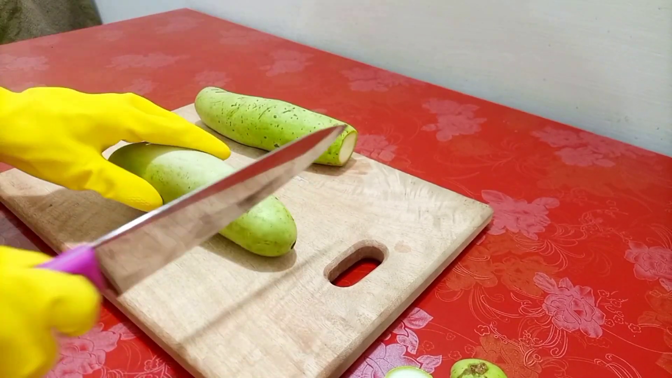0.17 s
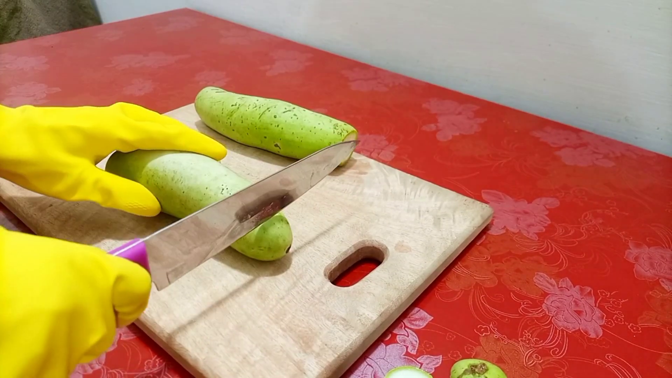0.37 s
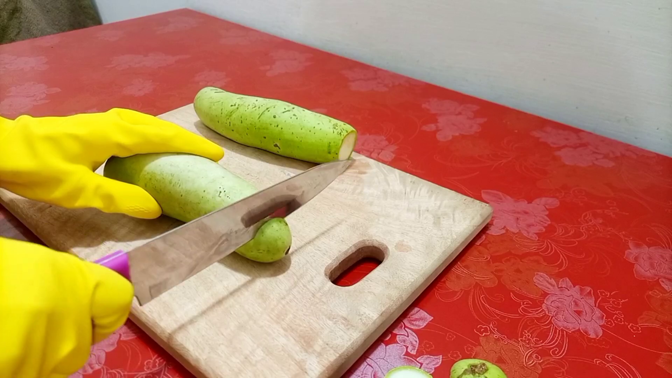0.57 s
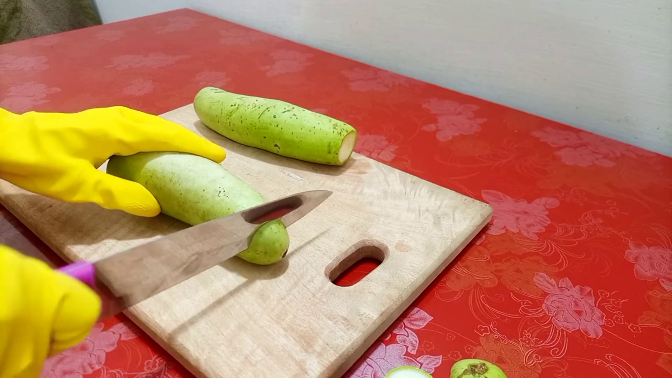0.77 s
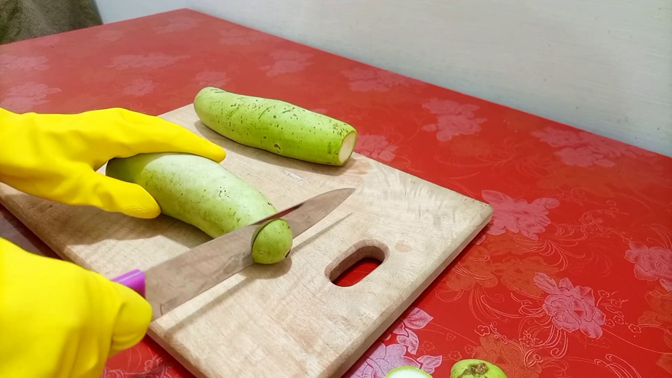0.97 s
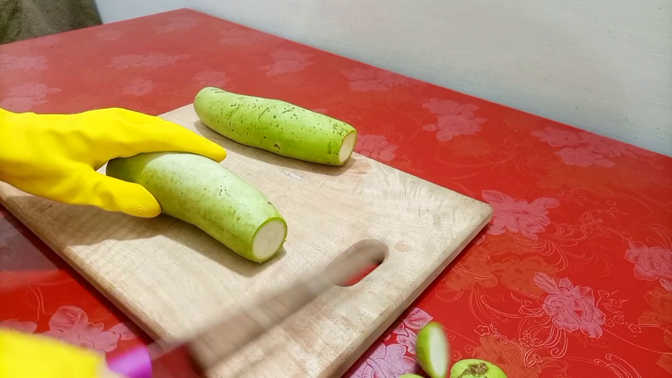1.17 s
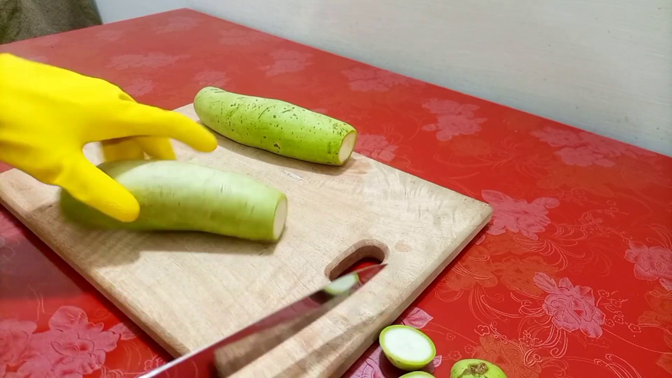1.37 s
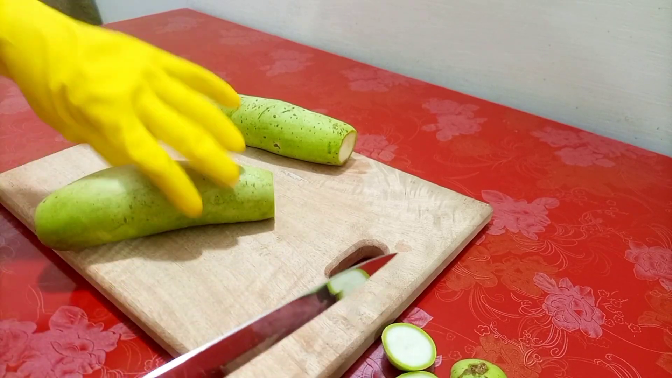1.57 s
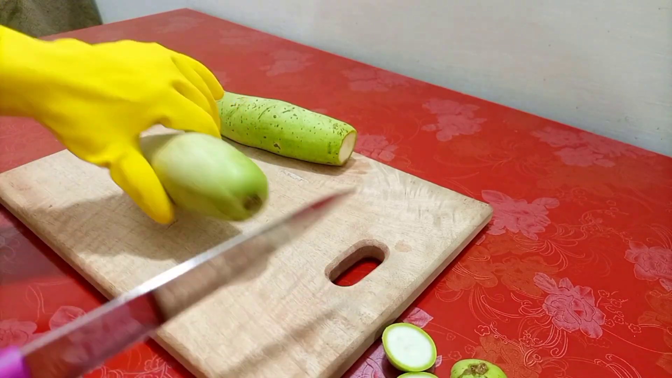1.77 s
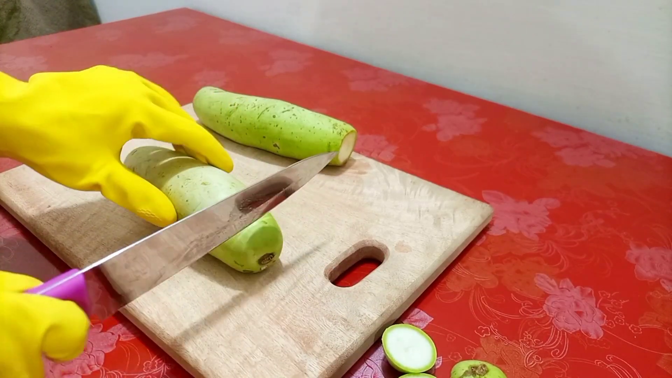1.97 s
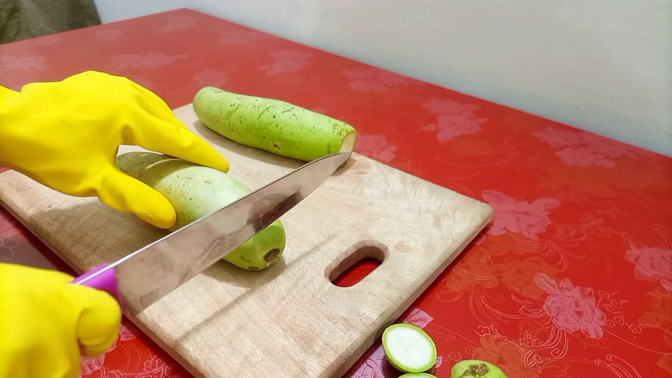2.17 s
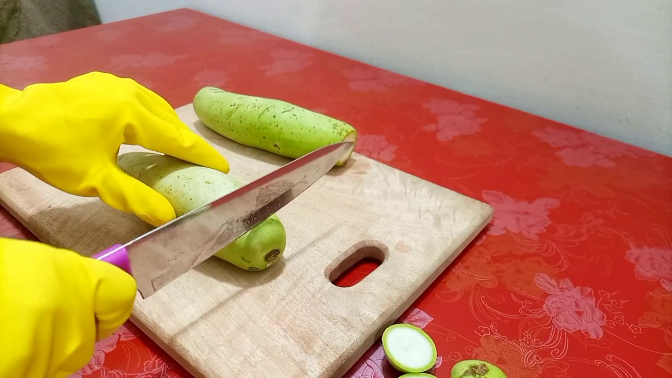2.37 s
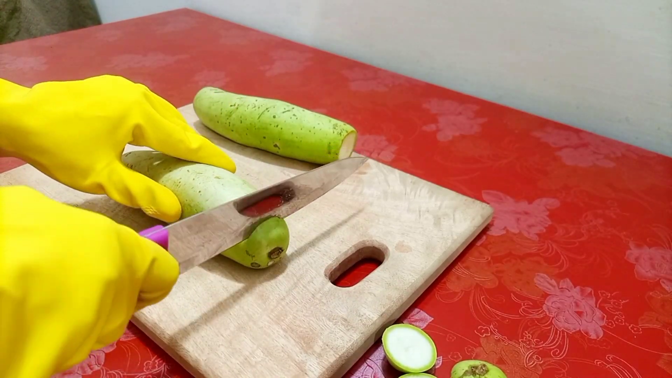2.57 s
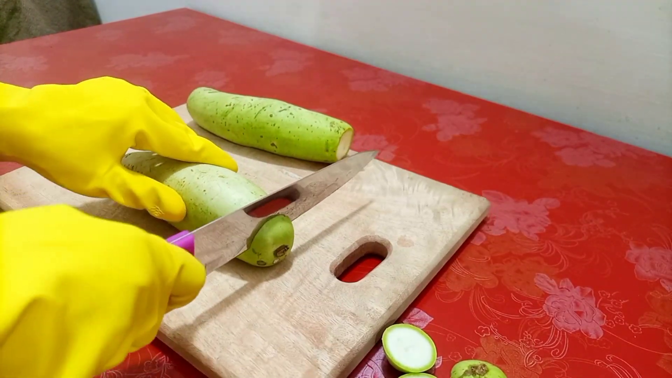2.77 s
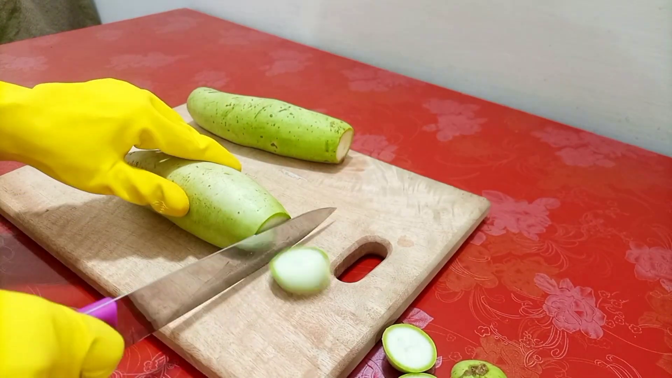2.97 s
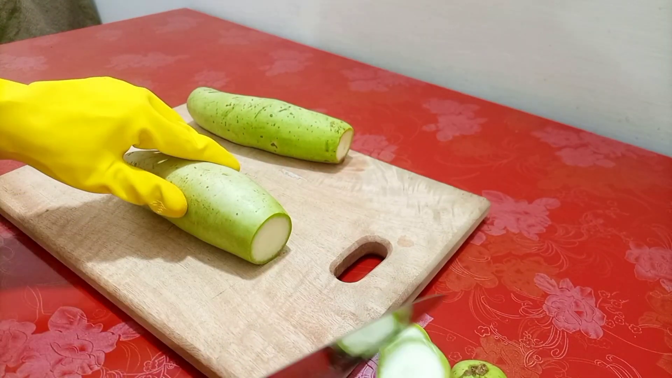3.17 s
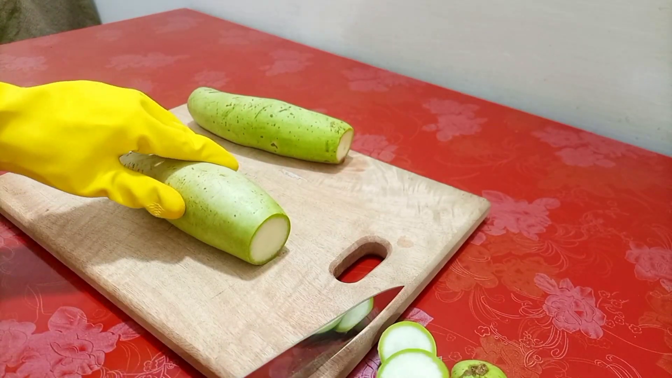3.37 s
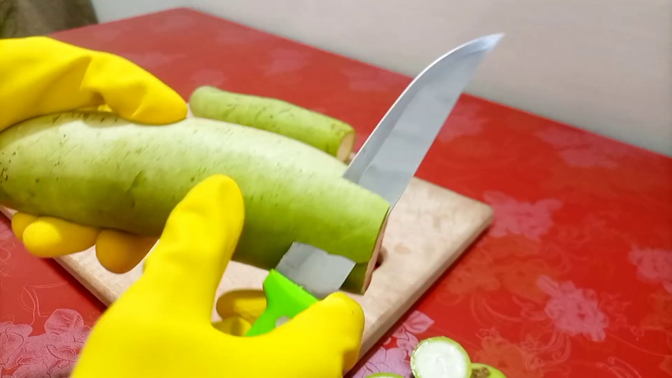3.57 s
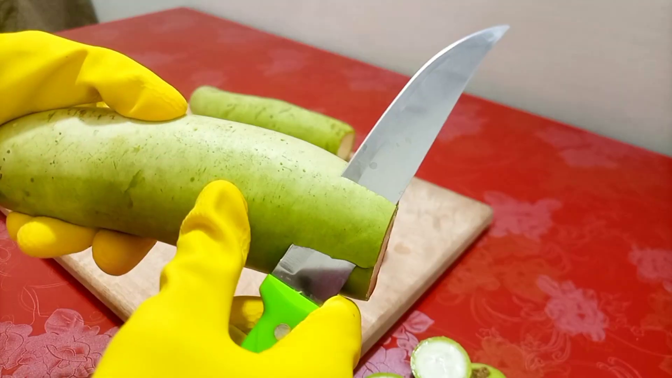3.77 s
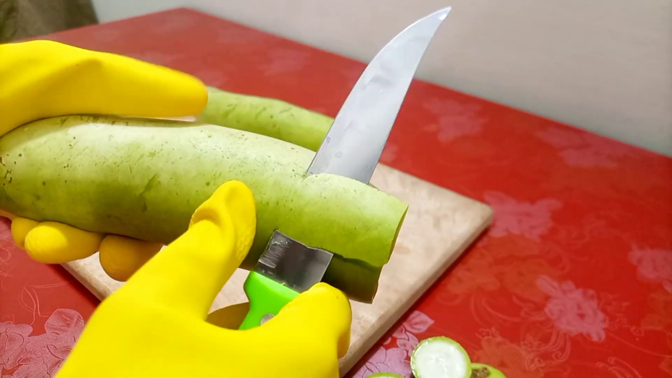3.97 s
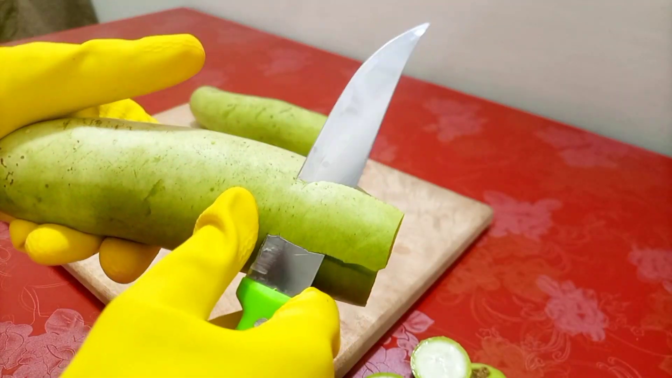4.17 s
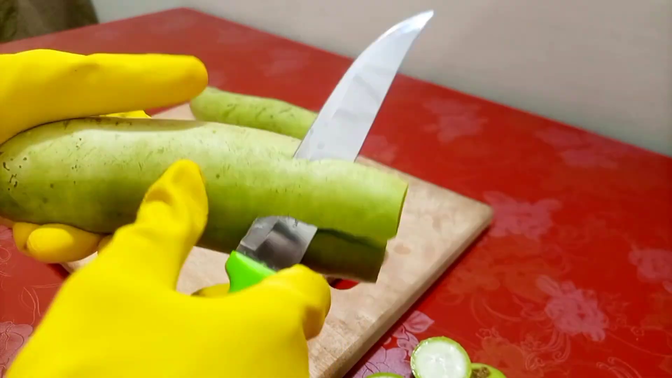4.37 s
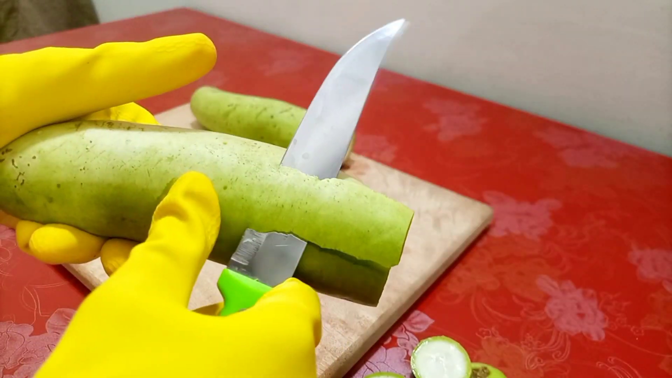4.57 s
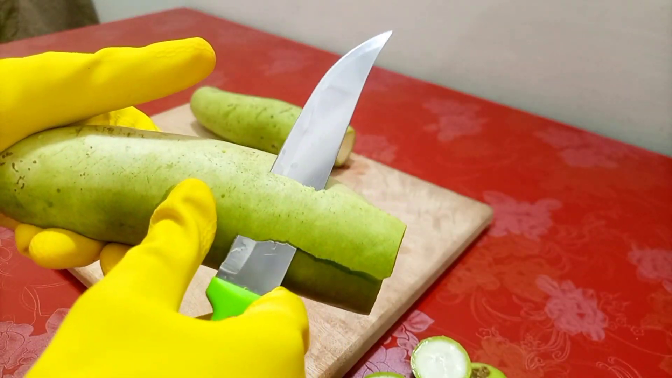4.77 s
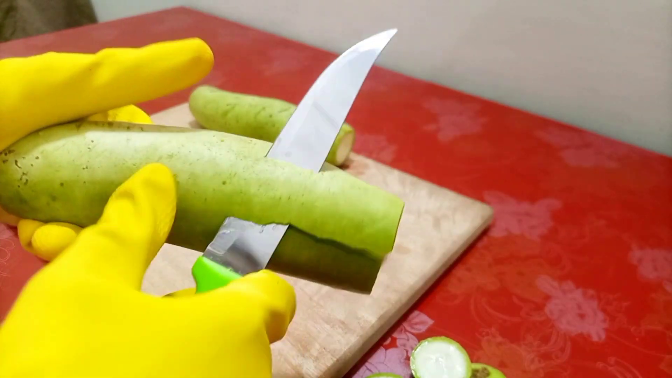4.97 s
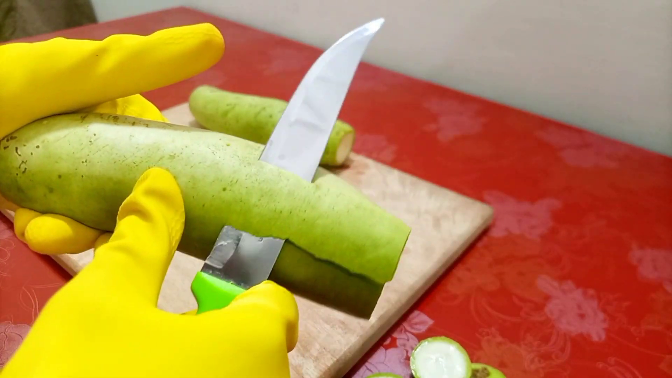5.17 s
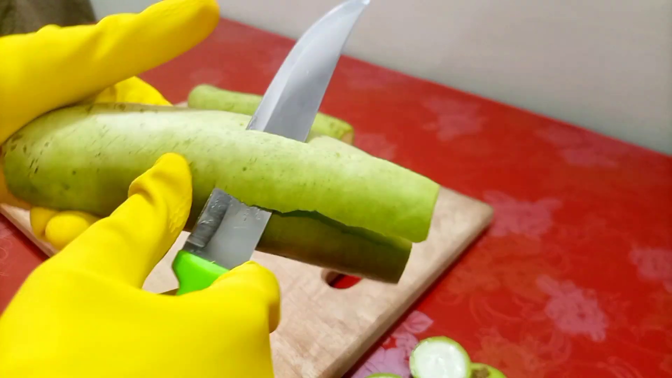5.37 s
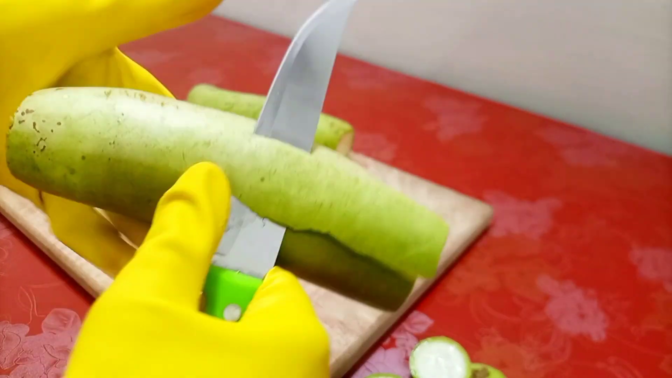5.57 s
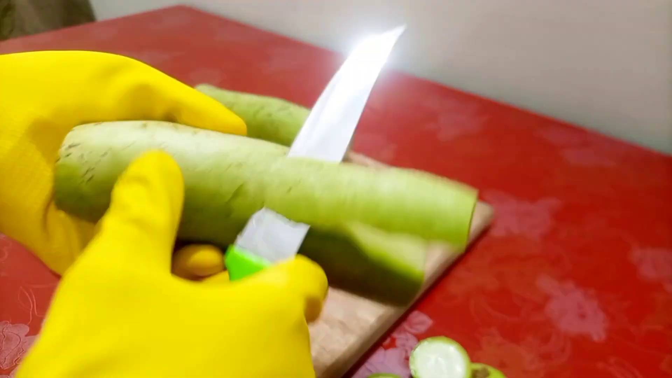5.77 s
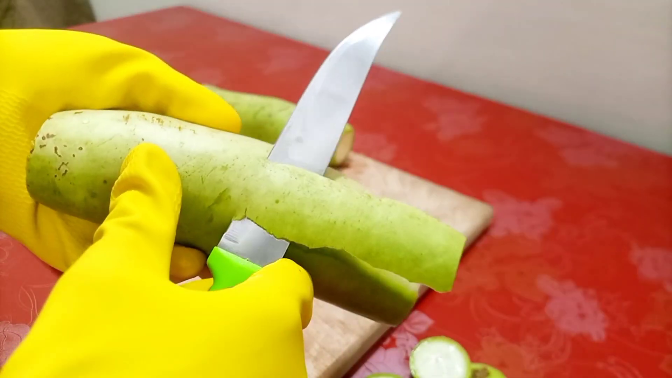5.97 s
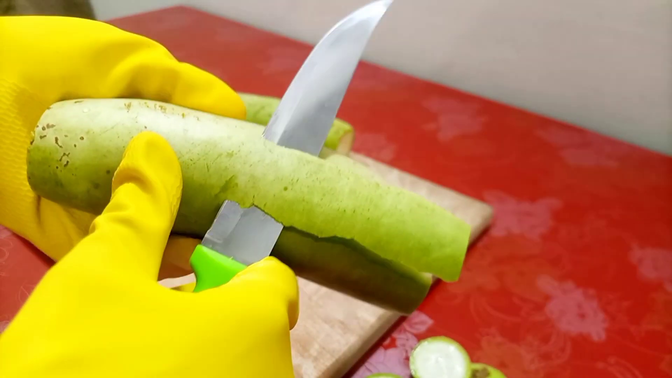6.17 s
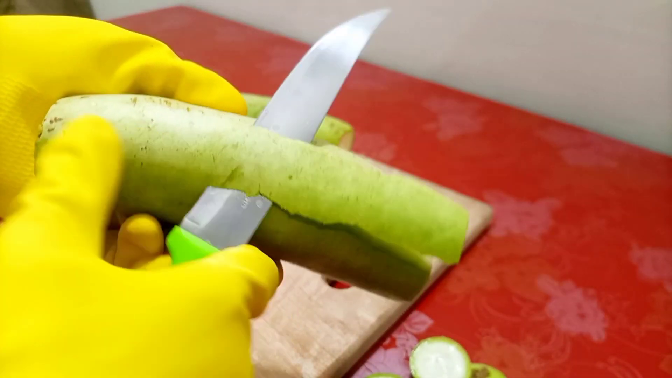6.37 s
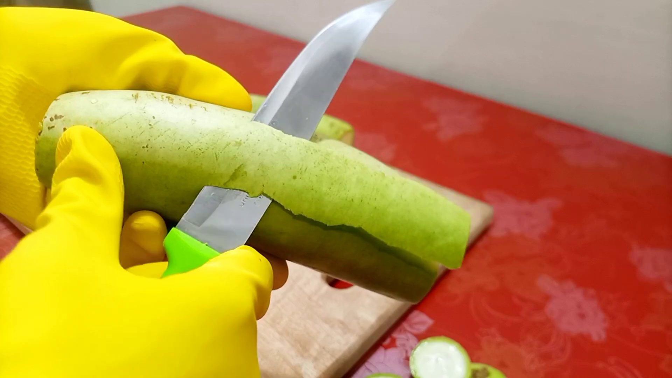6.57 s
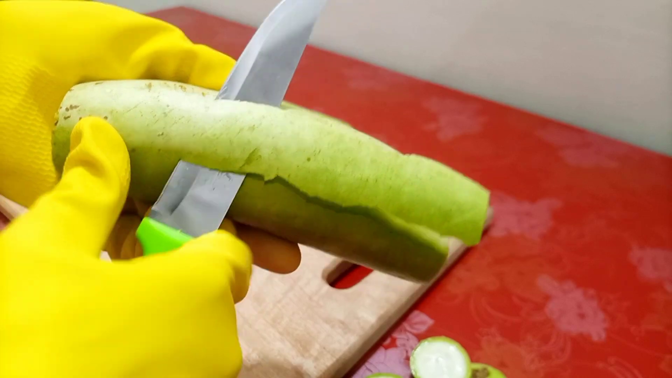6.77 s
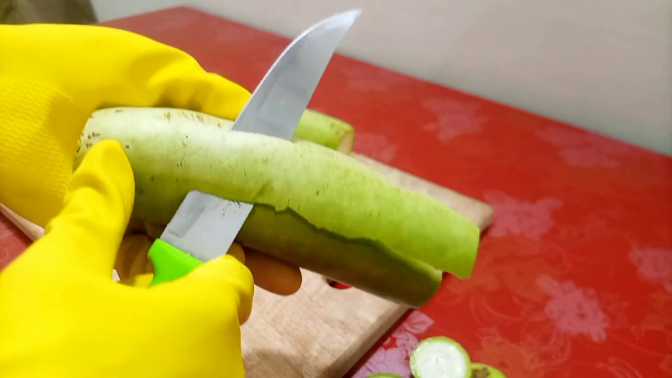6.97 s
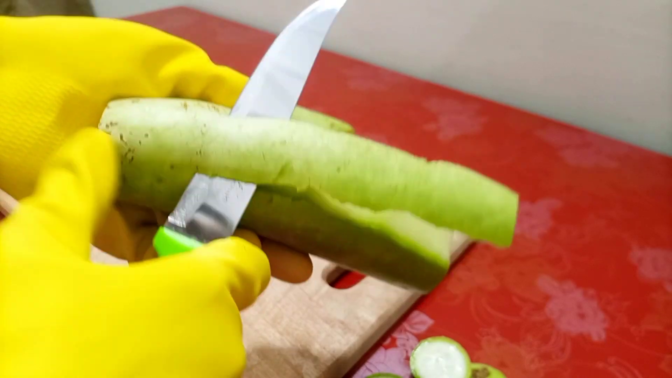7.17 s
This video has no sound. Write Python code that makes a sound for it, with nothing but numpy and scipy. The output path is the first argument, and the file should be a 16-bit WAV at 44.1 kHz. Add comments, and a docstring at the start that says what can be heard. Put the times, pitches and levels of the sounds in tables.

```python
"""An appliance hums under a steady hiss while hands and a squash bump a table in soft, low thuds.
After one second a knife cuts through the squash and hits a wooden board with a dry, ringing knock.
Hollow taps and faint ticks of the peel follow. Near three seconds comes a second chop, and a slice
falls. The sound drops out for a moment, then thuds and ticks carry on more quietly."""
import sys
import numpy as np
from scipy import signal
from scipy.fft import rfft, irfft, next_fast_len
from scipy.io import wavfile
from scipy.ndimage import uniform_filter1d, map_coordinates

SR = 44100
rng = np.random.default_rng(int(sys.argv[2]) if len(sys.argv) > 2 else 0)


def master_out(mix):
    """Clip the mix to full scale and print it as 16-bit PCM to the path in sys.argv[1]."""
    frames = np.transpose(np.atleast_2d(mix))
    ceiling = np.clip(frames, -1, 1)
    pcm = np.round(ceiling * 32767).astype(np.int16)
    wavfile.write(sys.argv[1], SR, pcm)


N = 318931

# Tone colour of the room and microphone hiss: (frequency [Hz], relative level [dB])
HISS_SPECTRUM = [(25, -32), (60, -14.5), (110, -0.5), (230, -10), (350, -2), (500, -12.5), (650, -6),
                 (1220, -8), (1400, -5.5), (3800, -8), (4600, -13), (5200, -18.5), (7000, -33), (8500, -46),
                 (13500, -47), (15000, -37)]
# Fuzzy bands of noise that go with the hum: (centre [Hz], width [Hz], level [dB])
HUM_BANDS = [(302.4, 27, -79.5), (617.7, 18, -79.5), (786, 15, -84), (907.5, 32, -80), (1357, 27, -78.5),
             (4460, 110, -79.5)]
# How strongly the table trembles as time passes: (time [s], level [dB])
TREMOR_LEVELS = [(0.0, -47.5), (0.16, -57), (0.34, -61.5), (1.0, -72), (1.2, -58), (1.8, -69.5),
                 (1.92, -61.5), (2.2, -63.5), (2.96, -70), (3.48, -63), (3.65, -86), (4.3, -86),
                 (4.51, -74), (5.28, -76), (5.55, -68), (6.02, -88), (6.36, -70), (6.6, -77), (7.23, -72)]
# Tone colour of that trembling: (frequency [Hz], relative level [dB])
TREMOR_SPECTRUM = [(20, -26.5), (40, -8), (65, 0), (110, -3), (170, -9), (260, -20), (400, -33.5),
                   (800, -81), (3000, -140)]
# Bumps carried by the table: (time [s], pitch [Hz], level [dB], length [ms])
TABLE_THUDS = [(0.004, 120, -37, 24), (0.082, 218, -36.5, 11), (0.099, 144, -26, 5.9),
               (0.125, 191, -35, 28), (0.152, 181, -35, 3.7), (0.239, 102, -39.5, 7.3),
               (0.298, 135, -40, 29), (0.375, 141, -49, 18), (0.405, 81, -53, 20), (0.546, 116, -46, 14),
               (0.634, 134, -46.5, 19), (0.686, 191, -44.5, 11), (0.745, 94.5, -50, 43),
               (0.955, 89, -49, 30), (1.05, 348, -23.5, 6.3), (1.085, 106.5, -35.5, 55),
               (1.148, 161, -41.5, 7.1), (1.208, 79.5, -42, 24), (1.303, 75.5, -44, 31),
               (1.364, 106.5, -41, 44), (1.468, 103.4, -56.5, 68), (1.601, 79, -45, 22),
               (1.702, 94.5, -50.5, 23), (1.747, 78.6, -46, 25), (1.885, 204, -34, 9.1),
               (1.89, 102, -29, 26), (1.985, 80.6, -49.5, 36), (2.008, 137, -47.5, 19),
               (2.025, 166, -36.5, 7), (2.102, 119, -53.5, 21), (2.144, 114, -42.5, 28),
               (2.271, 85, -53.5, 43), (2.3, 108, -47, 13), (2.401, 110, -55.5, 33), (2.626, 79.4, -60, 48),
               (2.81, 111, -51, 41), (2.864, 87, -57, 13), (2.982, 93, -42.5, 40), (3.091, 150, -36.5, 7.9),
               (3.117, 117, -36.5, 25), (3.14, 136, -37.5, 16), (3.162, 130, -48, 18),
               (3.258, 94.5, -41.5, 23), (3.282, 183, -41, 7.6), (3.325, 119, -34, 18),
               (3.372, 187, -37.5, 10.5), (3.392, 105, -47, 31), (3.478, 100, -45, 25),
               (3.585, 96, -40.5, 14), (3.605, 122, -36.5, 17), (3.645, 81.6, -52, 37),
               (3.934, 67, -47.5, 12), (4.03, 81, -50.5, 31), (4.326, 61.6, -48, 15), (4.508, 77, -43, 11),
               (4.579, 113, -53.5, 37), (4.722, 94, -40, 15), (4.75, 92, -43.5, 15), (4.812, 87, -52.5, 39),
               (5.02, 59.6, -52.5, 57), (5.19, 65, -53, 24), (5.321, 87, -46, 11), (5.372, 85, -44, 57),
               (5.391, 126, -37.5, 15.3), (5.445, 103, -45, 30), (5.575, 93, -56, 34),
               (6.412, 60.3, -56, 13), (6.771, 85.4, -53.5, 24), (6.843, 62.7, -47, 21),
               (6.893, 50, -50, 32)]
# Ticks of peel and blade: (time [s], centre [Hz], width [Hz], level [dB], length [ms])
PEEL_TICKS = [(1.26, 9700, 150, -86, 9), (1.26, 15100, 500, -81, 9), (1.262, 8610, 110, -79, 18),
              (1.265, 6000, 700, -77, 12), (3.132, 4780, 250, -63.5, 47), (3.855, 7700, 1200, -79, 5.5),
              (4.603, 7860, 900, -82, 9), (5.259, 5400, 700, -76, 12), (5.358, 6650, 700, -74, 9),
              (6.763, 6150, 1000, -74.5, 12)]
# Hollow taps on the squash: (time [s], pitch [Hz], level [dB], length [ms])
SQUASH_TAPS = [(1.212, 566, -45, 5), (1.226, 553, -49, 7.5), (1.262, 474, -59, 11), (2.08, 624, -62, 20),
               (2.635, 607, -58.5, 22), (3.193, 610, -56, 24), (3.24, 890, -59, 16),
               (3.325, 672, -38.5, 12), (3.331, 1288, -41.5, 12)]
# The board's own notes: (pitch [Hz], relative level [dB], base time to fade by 60 dB [s])
BOARD_NOTES = [(191, 2, 0.066), (364, -5, 0.093), (408, -12, 0.037), (650, -19.5, 0.055), (733, 1, 0.063),
               (830, -9.5, 0.061), (983, -10, 0.046), (1296, -7.5, 0.048), (1600, -10.5, 0.099),
               (1864, -5.5, .09), (2082, -2.5, 0.058), (2404, -9.5, 0.047), (2620, -7.5, 0.079),
               (2830, -5.5, 0.065), (3224, -13, 0.055), (4580, -10, 0.077)]
# Tone colour of the noisy burst of each knock: (frequency [Hz], relative level [dB])
BURST_SPECTRUM = [(40, 2.5), (100, -11.5), (370, 5), (560, -27), (740, -3), (1100, -9.5), (1900, -4),
                  (3200, -5), (5000, -12.5), (6000, -28.5), (7000, -36), (8500, -49), (15000, -67)]
# That burst's short tail in the room: (frequency [Hz], base time to fade by 60 dB [s])
BURST_FADES = [(150, 0.12), (700, 0.15), (2200, 0.19), (4500, 0.062), (6500, 0.16), (9000, 0.05),
               (15000, .04)]
# Tone colour of the snap of the blade's edge: (frequency [Hz], relative level [dB])
SNAP_SPECTRUM = [(4500, -30), (6000, -2), (7300, -2), (8500, -6), (12000, -15), (14000, -17), (14900, 2),
                 (15400, -9)]
# Two chops and a falling slice:
# (time [s], brightness [Hz], time for brightness to halve [s], bass cut [Hz], snap level [dB])
BOARD_BLOWS = [(1.042, 2560, .3, 141, -52.5), (2.9328, 8500, 0.029, 370, -40.5), (3.314, 950, .5, 487, -90)]
# Each blow lands as several quick contacts:
# (time [s], level [dB], ring time [factor], bass boost [dB], treble boost [dB])
BLOW_CONTACTS = [(1.04, -27, 0.47, 1, 4), (1.0417, -15.5, 0.26, -3.5, 4.5), (1.0447, -22, 0.37, 6.5, -10),
                 (1.053, -14, 0.34, -0.5, -0.5), (1.0572, -15, 0.33, -3, 1), (1.064, -26.5, 1.6, -12, 0),
                 (1.086, -33.5, 0.72, -1, -6), (1.102, -38.5, 0.6, 0, 0), (2.928, -40, 0.84, 6, 3),
                 (2.9326, -10, 0.23, 0.5, 0.5), (2.936, -15, 0.21, 0, 1), (2.939, -23.5, 0.37, 3.5, -11),
                 (2.946, -20.5, 0.51, -2.5, 2), (2.953, -22, 1.05, -6, 4), (2.966, -31, 0.63, -2, -1),
                 (2.982, -32.5, 1, -4, 2), (3.314, -22.5, 0.63, -2, 2), (3.319, -16.5, 0.38, -4.5, -11),
                 (3.329, -28.5, 1.34, -10, 0)]


def amp(db):
    """Turn decibels into a factor to multiply by."""
    return 10 ** (np.asarray(db) / 20)


def unit(x):
    """Scale a signal to an average (rms) strength of 1."""
    return x / np.sqrt(np.mean(x ** 2) + 1e-20)


def along(points, hz):
    """Read between (frequency, value) points on a logarithmic frequency axis."""
    freqs, values = np.transpose(points)
    return np.interp(np.log(hz + 1), np.log(freqs + 1), values)


def wobble(rate):
    """A smooth curve through `rate` random values a second."""
    values = rng.standard_normal(int(N * rate / SR) + 4)
    return map_coordinates(values, [np.arange(N) * rate / SR])


def filtered(x, response):
    """Multiply each frequency in x by response(frequency)."""
    size = next_fast_len(len(x) + 8192)
    return irfft(rfft(x, size) * response(np.fft.rfftfreq(size, 1 / SR)), size)[:len(x)]


def noise(response, length=N):
    """Noise of strength 1, coloured by a filter response."""
    return unit(filtered(rng.standard_normal(length), response))


def colour(spectrum):
    """A filter response that follows (frequency [Hz], level [dB]) points."""
    return lambda f: amp(along(spectrum, f))


def band(f, centre, width):
    """A filter response that favours frequencies near the centre."""
    return 1 / (1 + (2 * (f - centre) / width) ** 2)


def shelf(f, hz, low_db=0, high_db=0):
    """A filter response with one level below hz and another above."""
    return (amp(low_db) * hz + amp(high_db) * 1j * f) / (hz + 1j * f)


def bumps(rows, skew, roughness, grit_spectrum):
    """Brief swells of tone mixed with gritty noise; a skew below 1 makes them fall faster than they rise."""
    tones, swells = np.zeros(N + SR), np.zeros(N + SR)
    t = np.arange(-SR // 8, SR // 8) / SR
    for time, hz, db, ms in rows:
        half_length = ms / 1000 / 2 * np.where(t < 0, 1 / skew, skew)
        swell = amp(db - 5.55 * (t / half_length) ** 2)
        tones[round(time * SR):][:len(t)] += swell * np.cos(2 * np.pi * (hz * t + rng.random()))
        swells[round(time * SR):][:len(t)] += swell
    grit = swells[SR // 8:][:N] * noise(colour(grit_spectrum))
    return tones[SR // 8:][:N] + roughness * grit


def hiss():
    """A steady hiss whose level flickers faintly in small patches of time and frequency."""
    grid = signal.stft(noise(colour(HISS_SPECTRUM)), nperseg=512)[2]  # frequency by time
    flutter = uniform_filter1d(rng.standard_normal(grid.shape), 2, axis=0)
    flutter = uniform_filter1d(flutter, 3, axis=1)
    watery_hiss = signal.istft(grid * amp(2.0 * unit(flutter)), nperseg=512)[1][:N]
    return amp(-61.0) * unit(watery_hiss)


def appliance_hum(hz=301, db=-70):
    """An appliance hums on one slightly unsteady note, with fuzzy bands of noise."""
    pitch = hz + 3.59 * wobble(12)
    tone = np.sqrt(2) * np.sin(2 * np.pi * np.cumsum(pitch) / SR)
    fuzz = sum(amp(level) * noise(lambda f: band(f, centre, width)) for centre, width, level in HUM_BANDS)
    return amp(db + 1.4 * wobble(5.7)) * tone + fuzz


def table_tremor():
    """The table trembles a little, making a low rumble that comes in lumps."""
    level_db = np.interp(np.arange(N) / SR, *np.transpose(TREMOR_LEVELS))
    lumps_db = 3.0 * wobble(4.2) + 1.3 * wobble(33)
    return amp(level_db + lumps_db) * noise(colour(TREMOR_SPECTRUM))


def table_thuds(bass_cut_hz=23.7):
    """Hands and squash bump the table: soft, low thuds with their deepest bass filtered out."""
    thuds = bumps(TABLE_THUDS, skew=0.91, roughness=0.43, grit_spectrum=TREMOR_SPECTRUM)
    return filtered(thuds, lambda f: (1j * f / (bass_cut_hz + 1j * f)) ** 2)


def peel_ticks(crackle_db=-41):
    """Peel and blade tick: short, high puffs of noise, each a band over a faint, broad crackle."""
    out = np.zeros(N + SR)
    t = np.arange(-SR // 8, SR // 8) / SR
    for time, hz, width, db, ms in PEEL_TICKS:
        puff = noise(lambda f: band(f, hz, width) + amp(crackle_db) * (f > hz / 2), len(t))
        swell = amp(db - 6.8 * (2 * t * 1000 / ms) ** 2)
        out[round(time * SR):][:len(t)] += swell * puff
    return out[SR // 8:][:N]


def squash_taps():
    """Fingers and blade tap the squash, which sounds hollow."""
    return bumps(SQUASH_TAPS, skew=0.99, roughness=0.24,
                 grit_spectrum=[(200, -45), (550, 4), (1200, -29.0), (3000, -100)])


def board_ring(t, ring_factor):
    """The struck board rings with all its notes at once, a little differently each time."""
    ring = np.zeros(len(t))
    for hz, db, fade_s in BOARD_NOTES:
        sign = rng.choice([-1, 1])
        fade = amp(db + rng.normal(0, 3.2) - 60 * t / (fade_s * ring_factor))
        ring += sign * fade * np.sin(2 * np.pi * hz * t)
    return ring


def knock_burst(t, ring_factor):
    """The noisy burst of a knock and its short tail in the room, fading at its own speed in each band."""
    hz, times, grid = signal.stft(rng.standard_normal(len(t)), SR, nperseg=128)
    fade_s = ring_factor * along(BURST_FADES, hz)[:, None]
    level_db = along(BURST_SPECTRUM, hz)[:, None] - 60 * times / fade_s
    return signal.istft(grid * amp(level_db), SR, nperseg=128)[1][:len(t)]


def blade_snap(t, rise, fade_s=0.021):
    """The blade's edge snaps in a very short, bright burst of noise."""
    burst = rise * amp(-60 * t / fade_s) * rng.standard_normal(len(t))
    return filtered(burst, colour(SNAP_SPECTRUM))


def board_knocks(tail_cut_s=0.082, snap_fade_db_per_s=2499):
    """Knife and falling slice hit the board; each contact sets off a ring, a noisy burst and a snap."""
    out = np.zeros(N + SR)
    t = np.arange(SR // 4) / SR
    tail_cut = amp(-10 * (t / tail_cut_s) ** 2)  # each knock's tail is cut short, so it sounds dry
    for time, db, ring_factor, bass_db, treble_db in BLOW_CONTACTS:
        nearest_blow = min(BOARD_BLOWS, key=lambda blow: abs(blow[0] - time))
        start, bright_hz, halving_s, bass_cut_hz, snap_db = nearest_blow
        # Late contacts are duller; both late and early ones snap less.
        late_s = max(time - start, 0)
        bright_hz /= 1 + late_s / halving_s
        snap_db -= snap_fade_db_per_s * late_s + 8 * (time < start - .002)
        # A soft contact builds up slowly, is less noisy and loses treble; a light one loses bass.
        rise = np.sin(np.pi / 2 * np.clip(t * bright_hz / 4.9, 0, 1)) ** 2
        ring = amp(-7.0) * board_ring(t, ring_factor)
        burst = amp(4.5) * (bright_hz / 4000) ** 0.29 * knock_burst(t, ring_factor)
        knock = filtered(rise * tail_cut * (ring + burst), lambda f: (
            1j * f / (bass_cut_hz + 1j * f)  # cuts bass
            / (1 + 1j * f / bright_hz) ** 2  # cuts treble
            * shelf(f, hz=1080, low_db=bass_db)
            * shelf(f, hz=4000, high_db=treble_db)))
        out[round(time * SR):][:len(t)] += amp(db) * knock + amp(snap_db) * blade_snap(t, rise)
    return out[:N]


def scene():
    """Add all the sources into one channel."""
    background = hiss() + appliance_hum() + table_tremor()
    return (background + table_thuds() + peel_ticks() + squash_taps() + board_knocks())[None]


def record(dry):
    """The sound drops out, blips, drops again and fades back in; the highest treble is cut off."""
    dropout_s, gap_s, return_s = 3.538, .0021, .0063
    top_hz = 15500
    elapsed = np.arange(N) / SR - dropout_s
    blip = (elapsed >= gap_s) & (elapsed < 2 * gap_s)
    fade_in = np.clip((elapsed - 2 * gap_s) / return_s, 0, 1) ** 2
    gain = np.select([elapsed < 0, blip], [1, .6], default=np.maximum(.03, fade_in))
    click = -.0068 * blip  # the wave steps down during the blip
    return filtered(dry[0] * gain + click, lambda f: f < top_hz)[None]


dry = scene()
out = record(dry)
master_out(out)
```